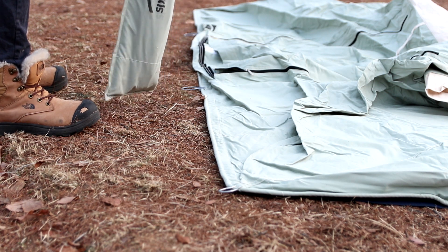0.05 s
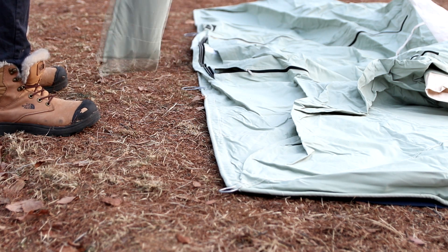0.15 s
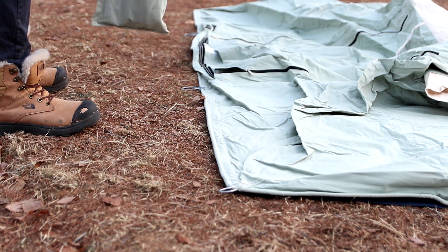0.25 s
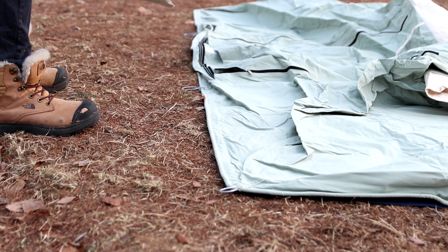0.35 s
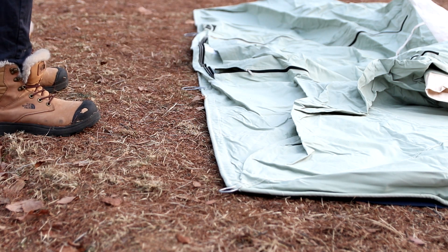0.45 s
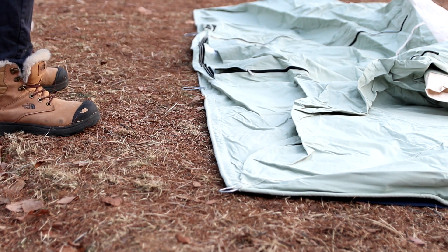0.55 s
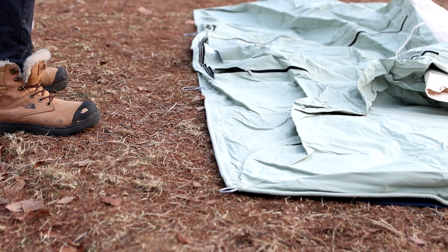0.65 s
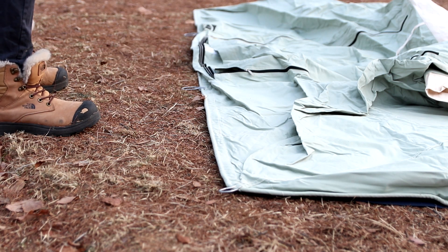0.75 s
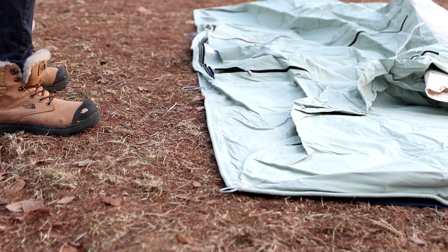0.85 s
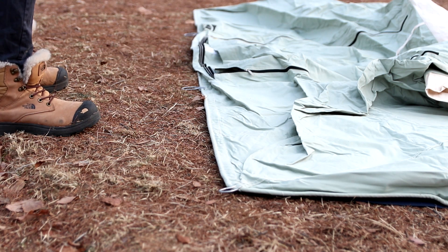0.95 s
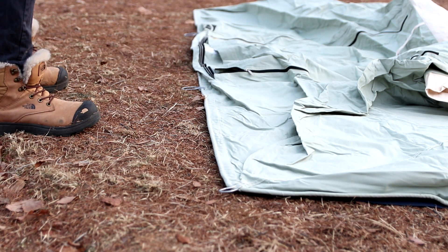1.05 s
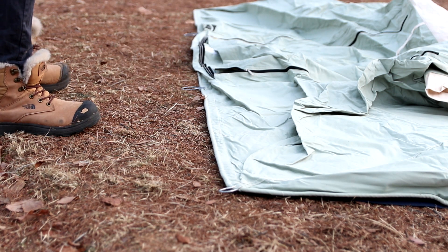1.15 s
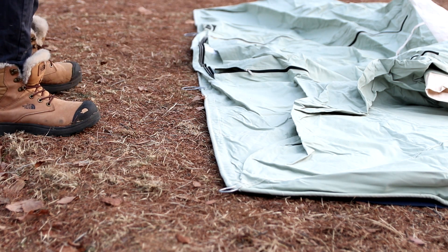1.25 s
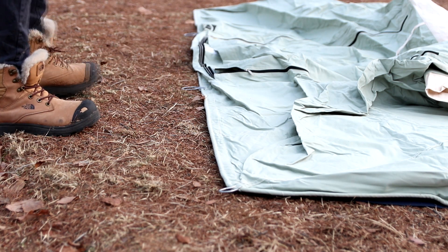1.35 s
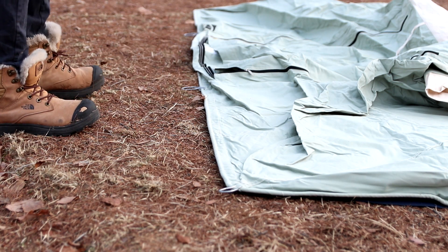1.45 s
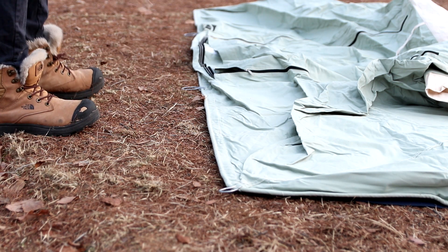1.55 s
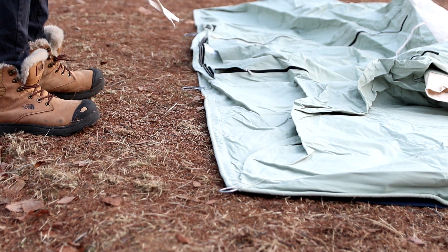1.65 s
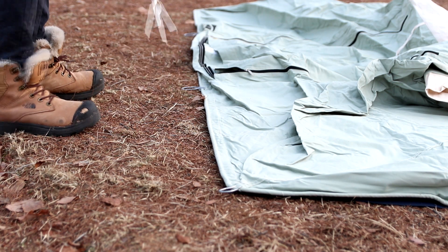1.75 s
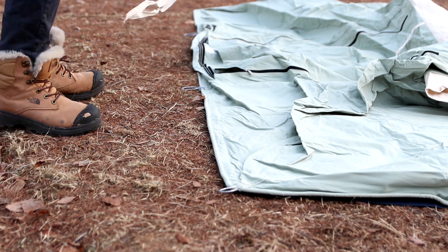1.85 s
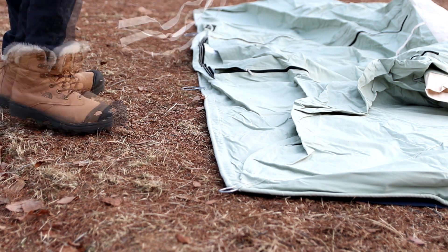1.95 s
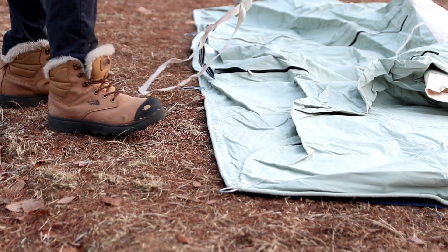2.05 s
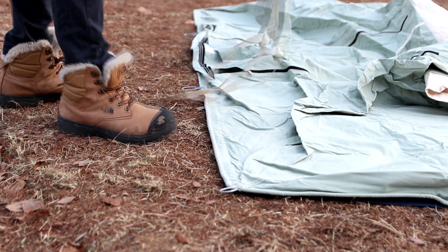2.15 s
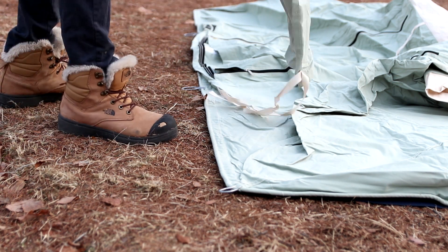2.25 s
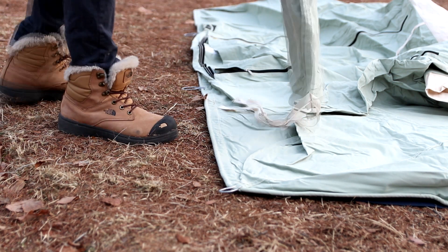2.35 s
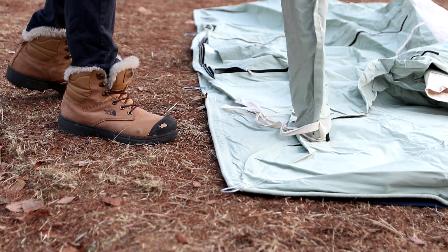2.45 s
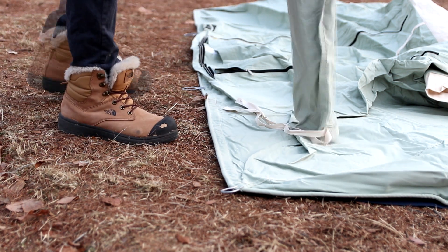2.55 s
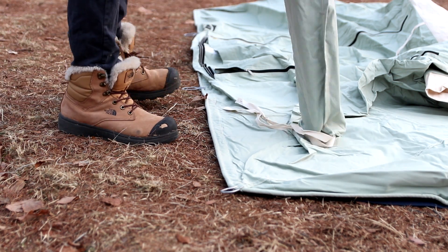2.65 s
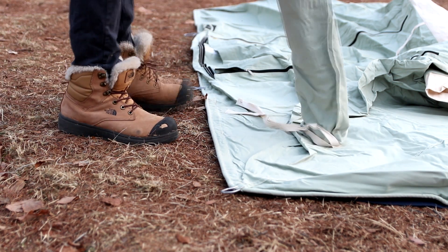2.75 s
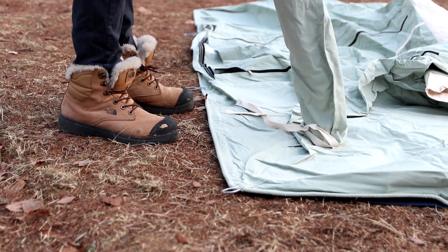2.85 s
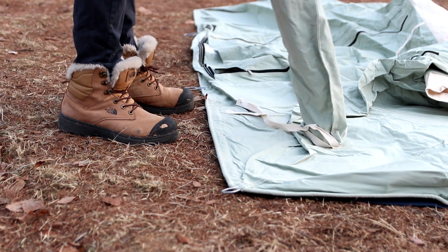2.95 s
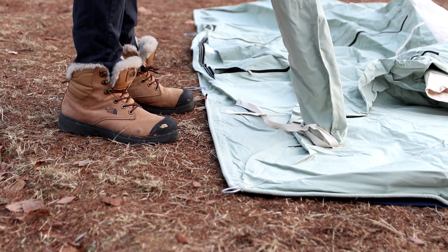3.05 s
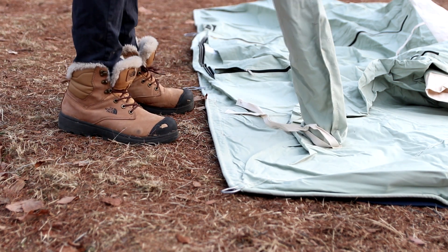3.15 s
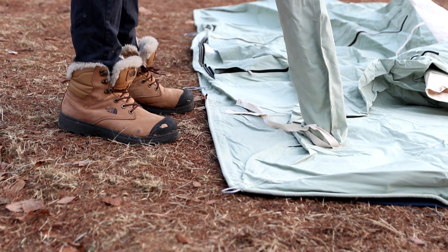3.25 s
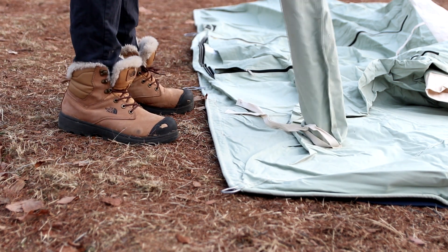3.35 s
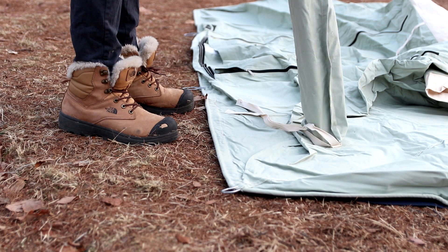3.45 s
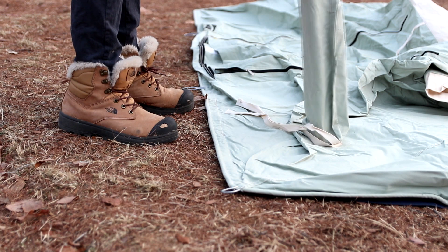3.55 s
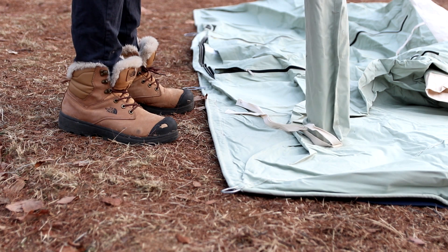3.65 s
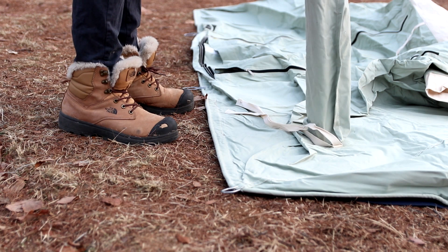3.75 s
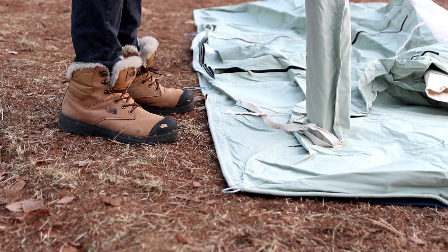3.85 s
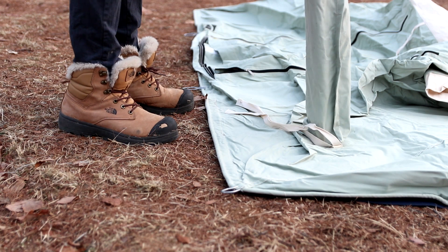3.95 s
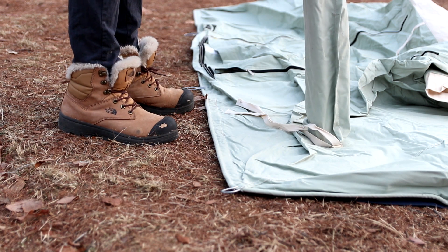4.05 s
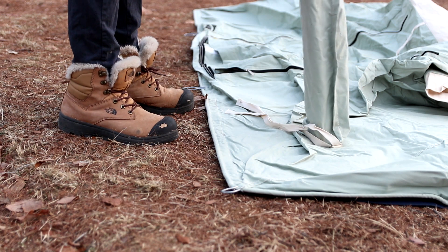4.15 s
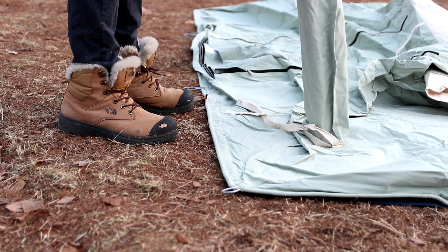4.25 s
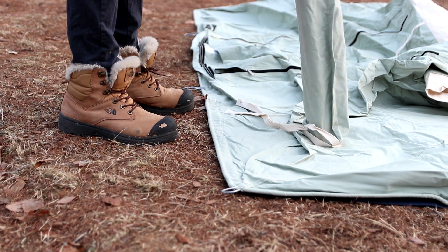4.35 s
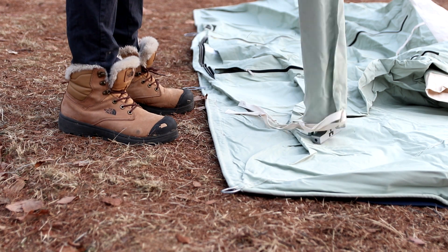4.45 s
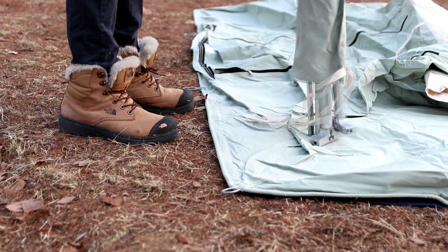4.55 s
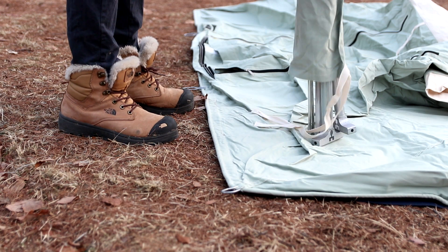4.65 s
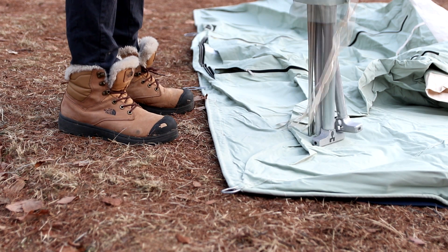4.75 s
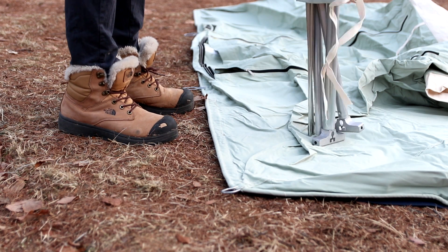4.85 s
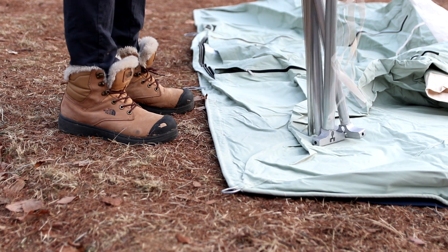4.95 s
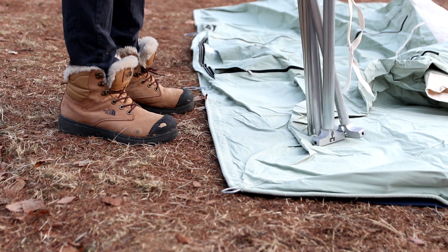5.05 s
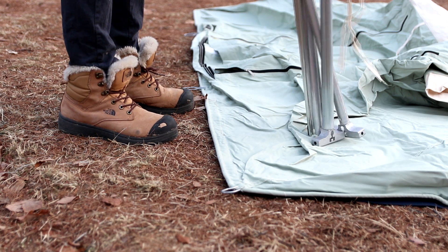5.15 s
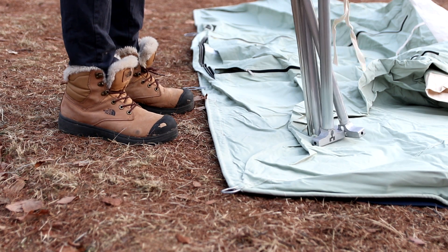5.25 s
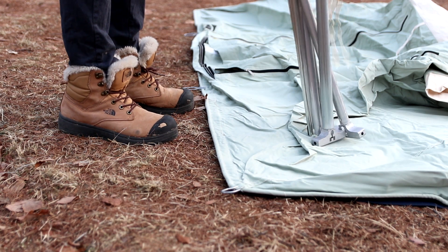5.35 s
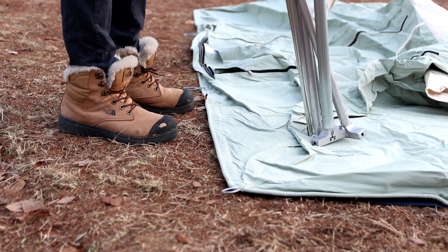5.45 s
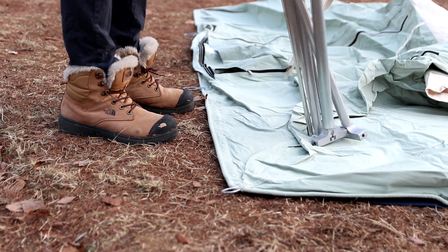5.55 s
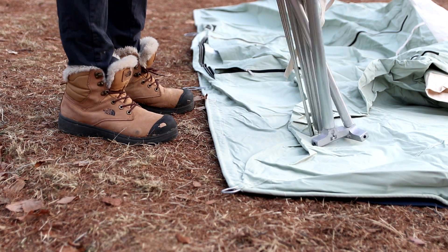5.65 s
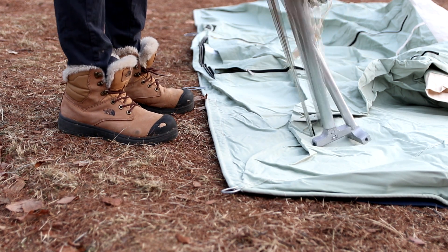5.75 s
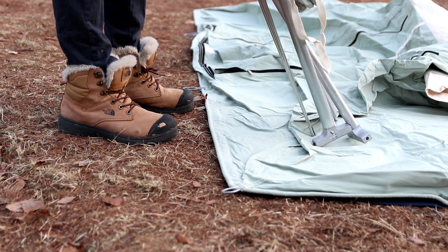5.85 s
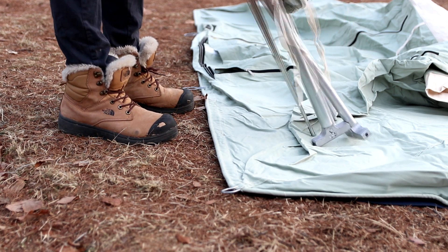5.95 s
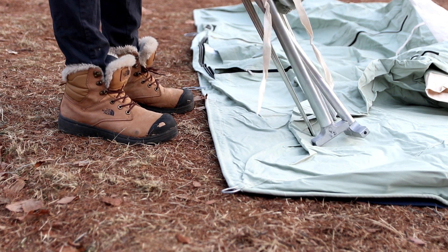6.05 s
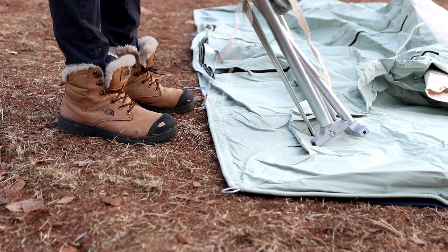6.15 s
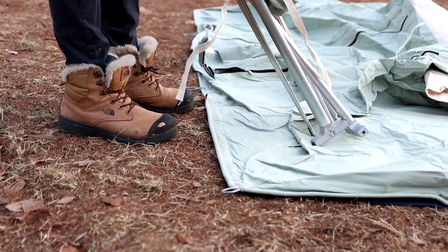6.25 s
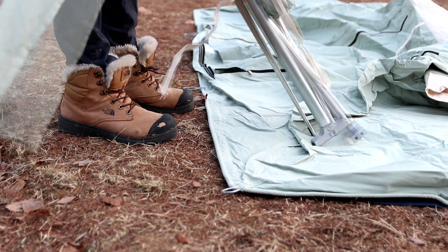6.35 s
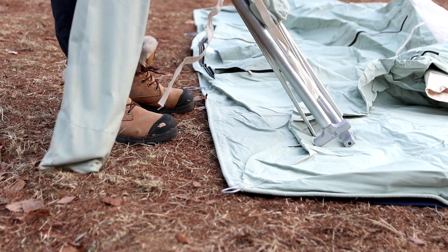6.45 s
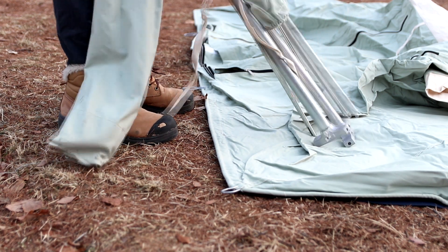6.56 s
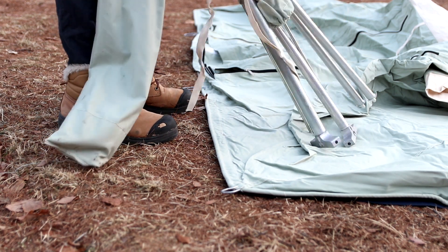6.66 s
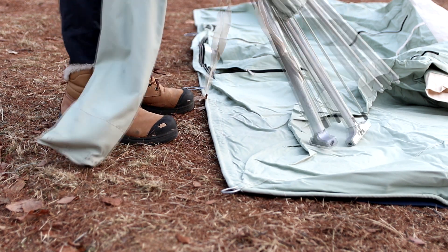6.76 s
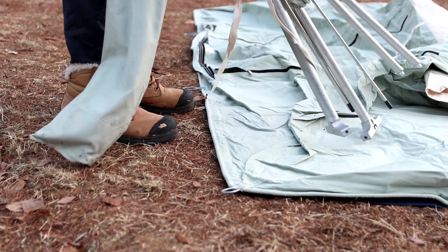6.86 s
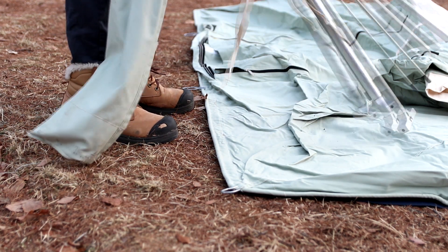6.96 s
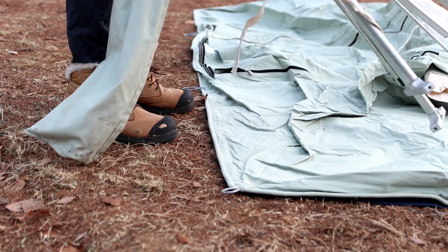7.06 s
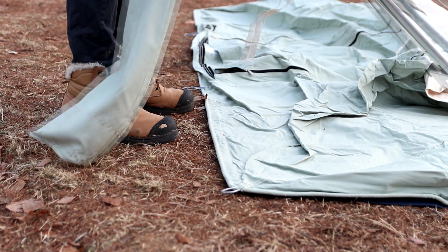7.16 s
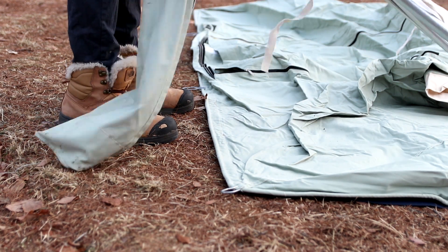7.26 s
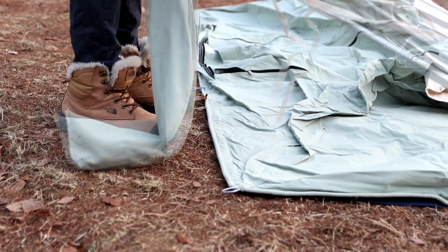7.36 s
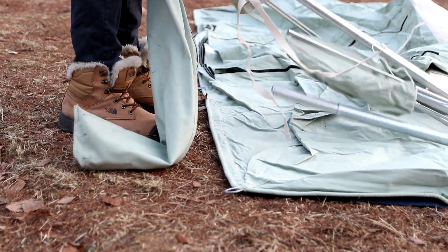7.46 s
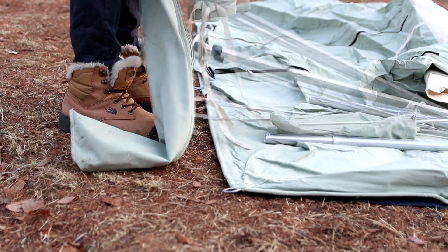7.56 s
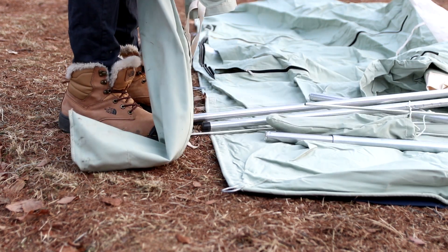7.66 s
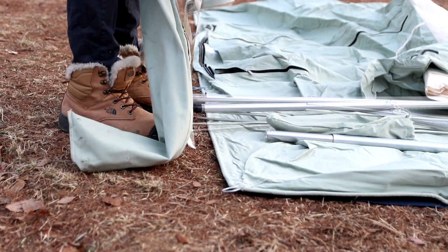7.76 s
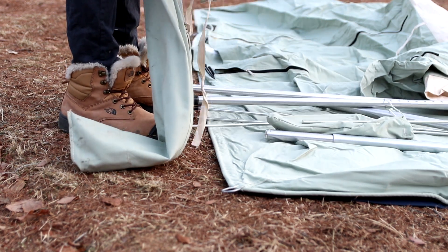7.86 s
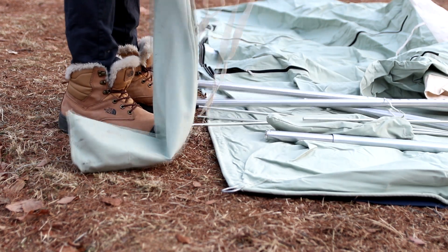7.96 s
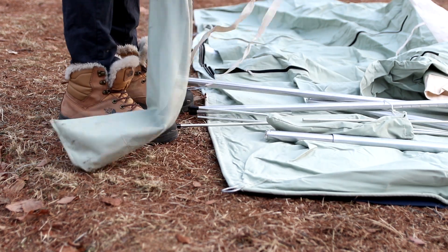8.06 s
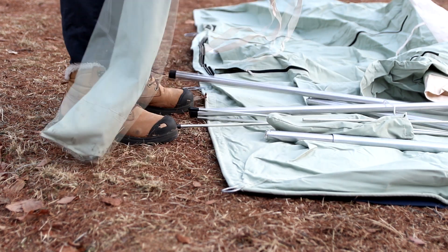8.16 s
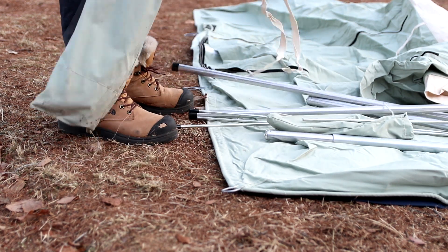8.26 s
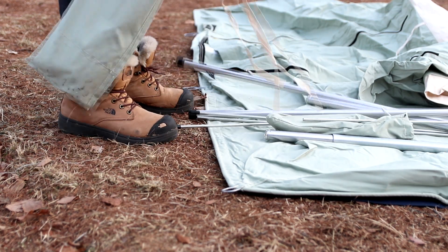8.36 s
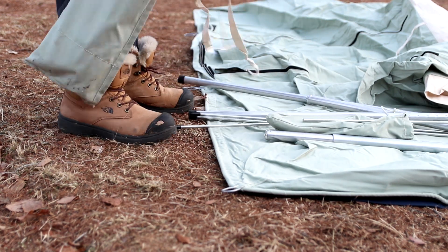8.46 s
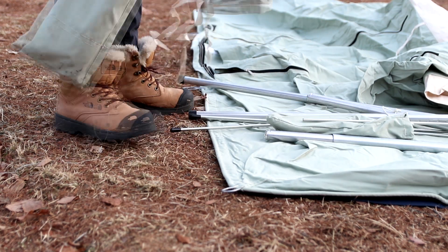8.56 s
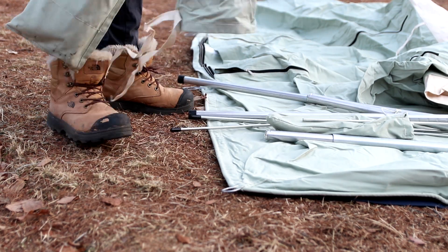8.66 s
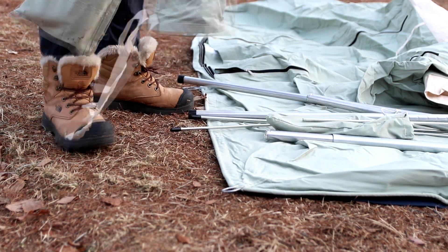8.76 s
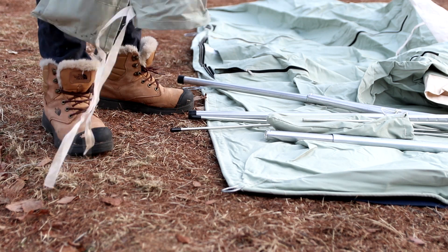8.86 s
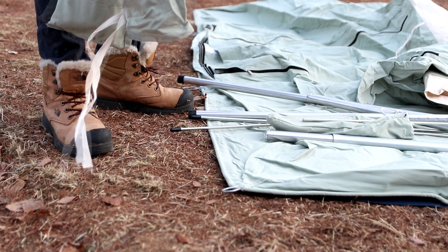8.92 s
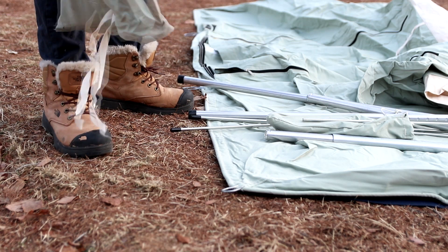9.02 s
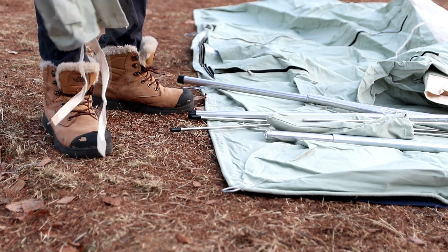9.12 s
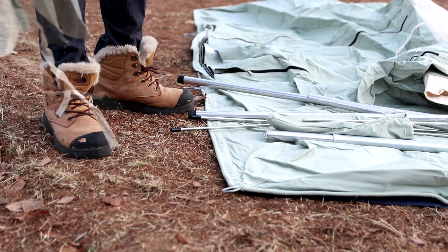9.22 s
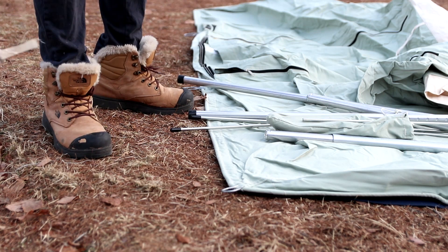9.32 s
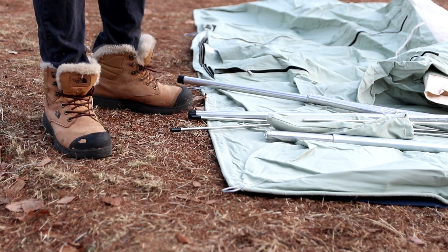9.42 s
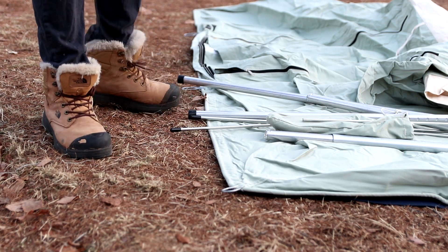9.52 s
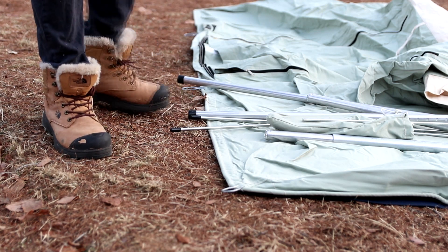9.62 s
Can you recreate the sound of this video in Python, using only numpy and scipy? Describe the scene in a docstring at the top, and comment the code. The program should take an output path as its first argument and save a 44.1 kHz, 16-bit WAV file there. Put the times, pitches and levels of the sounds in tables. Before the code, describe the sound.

Close, dry outdoor handling of metal tent poles: canvas rustles, tubes clack in sharp bursts, stakes jingle and everything clatters down onto cloth and dry ground.

```python
"""Outdoors on dry needles, close and without echo: tent poles leave their canvas bag and are laid down with stakes.
The tubes clack as coloured noise bursts and ring as beating sines; as they slide, uneven slips excite a resonance.
Steel stakes jingle from scattered ticks and ringing modes; bag, poles and boots land as low notes in puffs of noise.
Canvas rubs and swishes in strokes of noise with popping folds and crackling needles, over wind rumble and steady air.
The hardest knocks overload the microphone, which rounds off their peaks."""
import sys
import numpy as np
from scipy import signal
from scipy.fft import rfft, irfft, next_fast_len
from scipy.io import wavfile
from scipy.ndimage import map_coordinates

SR = 44100
rng = np.random.default_rng(int(sys.argv[2]) if len(sys.argv) > 2 else 0)


def transcribe(u):
    """Save the signal u as a 16-bit wav file named by the first command-line argument.

    u: samples, shape (n,) or (channels, n), limited to [-1, 1]; the rate is SR.
    q: integer samples, one column per channel.
    """
    v = np.clip(np.atleast_2d(u).T, -1, 1)
    q = np.round(v * 32767).astype(np.int16)
    wavfile.write(sys.argv[1], SR, q)


N = 427329

# Levels in the tables are relative: each layer has its own trims.
# tube strikes tube: start_s, level_db, extra hollow body_db, extra treble_db
TUBE_KNOCKS = [(0.8736, -28, 4.5, -13), (1.705, -35.5, 7, -13), (2.078, -34, -2, -32),
               (2.222, -32.5, -16, -18), (2.489, -20, -2, -19), (2.508, -22, -1, -30),
               (2.534, -19.5, 2, -13), (2.584, -23.5, -22, -33), (2.674, -25.5, -7, -10),
               (2.722, -26, 12, -10), (2.742, -12.5, -13, -16), (2.7656, -8.5, -8, -8),
               (2.8332, -9, -2, -7.5), (2.9473, -23.5, 1, -13), (2.9804, -20.5, 2, -12),
               (4.604, -19, -0.5, 3), (4.629, -23.5, -12, -9), (4.688, -26.5, -1, -6),
               (4.734, -10.5, -26, 6.5), (4.816, -27.5, -1, -3), (4.835, -26.5, 0, 2),
               (4.93, -29.5, -10, -3), (5.0244, -26.5, -3, -20), (5.0769, -31, -16, -34),
               (5.688, -21, -2, -1), (5.74, -21, -14, -12), (5.7513, -11.5, -12, -3),
               (5.772, -21.5, -7, -10), (6.096, -45, -3, -5), (6.5057, -17.5, -2.5, -2.5),
               (6.5759, -32.5, -6, -3), (6.6734, -27.5, -4, -11), (6.711, -30.5, 1, -27),
               (6.8114, -30, 4.5, -6), (6.8607, -15.5, -1, 11), (6.8755, -10.5, -3.5, 6.5),
               (6.908, -30, -8, 1), (7.409, -23, -25, -27), (7.5304, -5.5, -34, -3.5),
               (7.6298, -15, -34, 6), (7.723, -17.5, -25, 0), (7.811, -22, -1.5, 9), (7.866, -27, -18, 5),
               (7.947, -32, 0, 7), (8.045, -25.5, -5.5, 1), (8.068, -27.5, -3, 2.5), (8.163, -31, 3, -3),
               (8.353, -22.5, 3, -3), (8.4117, -19.5, 6, 0.5), (8.5119, -14, -10, 10), (8.544, -21, -3, 7),
               (8.56, -17.5, -1.5, 8), (8.7607, -24.5, -14, -10), (8.8763, -33, -12, -0.5),
               (9.673, -31.5, 10, -18)]
# colour of the clack: frequency_hz, level_db
CLACK_SPECTRUM = [(60, -32), (250, -2), (700, 5.5), (1500, 8), (2400, 6), (3400, 2), (5200, 1.5),
                  (6400, -1), (8200, 6.5), (10200, -6), (13000, -5), (16000, -11)]
# a harder blow presses the tubes together and damps them sooner
CLACK_T60_S, MEDIUM_BLOW_DB, DAMPING_DOUBLES_DB = 0.061, -20, 14.5
# a tube or stake left free sings on one note: start_s, pitch_hz, level_db, t60_s
FREE_NOTES = [(2.545, 4260, -34.5, 0.54), (2.62, 5750, -37, 0.2), (2.645, 4850, -37, 0.18),
              (2.742, 1400, -5.5, 0.034), (2.834, 4490, -27.5, 0.23), (2.949, 4580, -25, 0.094),
              (2.982, 5080, -38, 0.21), (4.629, 3400, -27, 0.076), (4.665, 1166, -26, 0.17),
              (4.734, 3550, -25, 0.22), (4.931, 1730, -15, 0.016), (5.078, 2470, -21, 0.066),
              (5.752, 8500, -16, 0.039), (6.875, 5150, -13, 0.077), (7.708, 3650, -26, 0.33),
              (7.811, 4206, -36, 0.4), (7.671, 2153, -18.5, 0.1), (7.811, 5080, -19, 0.47),
              (7.835, 5325, -27, 0.37), (7.865, 3000, -34, 1), (7.948, 4940, -30, 0.35),
              (8.044, 8500, -16.5, 0.023), (8.512, 9000, -15.5, 0.29), (8.512, 5720, -19, 0.11)]
# tubes sliding on each other and in their bag: start_s, length_s, resonance_hz, level_db
TUBE_SLIDES = [(3.348, 0.61, 510, -43), (4.416, 0.097, 525, -38.5), (4.596, 0.078, 5280, -23.5),
               (5.096, 0.16, 2700, -37.5), (6.932, 0.11, 2640, -34), (7.053, 0.73, 5280, -46),
               (7.054, 0.32, 8300, -46.5), (7.164, 0.049, 5520, -40), (7.294, 0.14, 5260, -40.5)]
# the stakes are jolted, chatter for a while and settle: start_s, level_db, hold_s
STAKE_JOLTS = [(2.542, -33, 0.016), (2.615, -31, .02), (3.3, -45, .012), (4.593, -34, 0.037),
               (4.734, -20.5, 0.022), (4.834, -30, .008), (6.571, -32.5, 0.019), (7.456, -31, .06),
               (7.531, -17, 0.048), (7.605, -23.5, 0.044), (7.666, -19, 0.024), (7.71, -19, 0.057),
               (7.801, -19, .07), (8.161, -34, 0.027), (8.353, -45, 0.019), (8.41, -22, 0.04),
               (8.514, -20.5, 0.062), (8.618, -27.5, .05), (8.759, -33.5, 0.017)]
JOLT_ATTACK_S, SETTLE_T60_S = 0.0053, 0.2
# modes of the stakes: pitch_hz, level_db, t60_s, spread between stakes_hz
STAKE_MODES = [(2190, -8, .12, 70), (2970, -8, .18, 45), (3680, -10, .2, 90), (4230, -13, .24, 20),
               (5060, -5, .22, 45), (5590, -9, .2, 55), (7250, -11, .22, 12), (8130, -6, .16, 70),
               (9027, -5, .2, 8), (9986, -16, .24, 12), (10993, -13, .24, 12), (12035, -8, .22, 18),
               (13112, -8, .2, 35), (14230, -7, .2, 90), (15400, -13, .18, 50)]
# colour of each stake contact tick: frequency_hz, level_db
TICK_SPECTRUM = [(80, -64), (400, -20), (800, 23.5), (1200, -47), (2200, 24), (4300, 4), (5200, 29.5),
                 (6400, 8), (8300, 4), (10300, -5), (14000, -5), (16000, -5)]
# soft landings of bag, poles and boots: start_s, level_db, pitch_hz
SOFT_LANDINGS = [(1.464, -18, 577), (2.471, -20, 474), (2.514, -9.5, 624), (2.53, -11.5, 343),
                 (2.534, -19, 84.5), (2.721, -13, 690), (2.735, -14.5, 288), (3.502, -27, 610),
                 (3.745, -29, 496), (3.814, -25.5, 460), (4.038, -27.5, 211), (4.444, -17, 530),
                 (6.637, -20, 494), (7.511, -8, 689), (7.519, -7.5, 215), (7.611, -14.5, 744.7),
                 (9.672, -23.5, 290)]
# strokes of the canvas, gathering speed and slowing again:
# fastest_s, rise_s, fall_s, rubbing_db, swish above rubbing_db
CANVAS_STROKES = [(0.55, 0.1, .09, -41.5, 2.5), (0.8, 0.39, .2, -46, -2.5), (1.47, 0.092, 0.42, -39.5, -5),
                  (2.7, 0.69, 0.11, -30.5, -5.5), (3.16, 0.03, 0.067, -37, -1.5),
                  (3.43, 0.58, 0.25, -41.5, -6), (3.76, 0.11, 0.058, -41, -0.5),
                  (4.05, 0.11, 0.056, -59, 9.5), (4.499, 0.052, 0.1, -28, -6),
                  (4.76, .12, 0.17, -29.5, -9.5), (5.04, 0.065, .17, -33.5, -4.5),
                  (5.66, 0.36, 0.42, -39, -4.5), (6.48, 0.1, 0.32, -35, -7.5), (7.12, 0.26, 0.14, -46, 3.5),
                  (7.55, 0.25, .14, -30, -4), (8.54, 0.19, 0.33, -33.5, -7), (9.42, 0.11, .07, -43.5, -6.5)]
IDLE_RUB_DB, IDLE_SWISH_DB = -49, -57  # the cloth never hangs quite still
# colour of cloth rubbing over the tubes: frequency_hz, level_db
RUB_SPECTRUM = [(100, -18.5), (280, -9), (500, 2), (750, 0), (1400, -1), (2400, -4), (4000, -16),
                (9000, -60)]
# colour of the cloth's airy swish: frequency_hz, level_db
SWISH_SPECTRUM = [(900, -26), (2500, 1), (4500, 1.5), (6000, 0.5), (8000, 5), (10500, -7.5), (14000, -5.5),
                  (16000, -12)]
# wind rumbles on the microphone: start_s, length_s, level_db
WIND_GUSTS = [(0.15, 0.58, -61), (8.047, 1.7, -52.5)]
# colour of the wind rumble: frequency_hz, level_db
RUMBLE_SPECTRUM = [(15, -3), (35, -2), (60, -5.5), (110, -21), (400, -60)]
# colour of the open air: frequency_hz, level_db
AIR_SPECTRUM = [(12, -25), (20, -9), (113, -6), (228, -1), (422, -3), (472, -3), (624, -4), (802, -4),
                (1760, -8), (1910, -7.5), (2390, -14), (7110, -18.5), (16000, -29.5)]
TOP_HZ = 15850  # the treble falls away above this


def knocks(clack_db=4, ring_db=-30, bundle_db=-27, bundle_t60=0.31, snap_db=-1, snap_t60=0.005, attack_s=0.00028):
    """Tubes pressed together give a snap and a dense, damped clack; the bundle buzzes on and the stakes ring faintly."""
    out, t = np.zeros(N), np.arange(SR // 3) / SR
    spot_hz = np.geomspace(300, 16000, 50)
    for start_s, level_db, body_db, treble_db in TUBE_KNOCKS:
        t60 = CLACK_T60_S * 2 ** ((MEDIUM_BLOW_DB - level_db) / DAMPING_DOUBLES_DB)
        hardness = [(700, body_db), (1400, 0), (3000, 0), (13000, treble_db)]
        # each point of contact favours its own groups of modes
        spot = np.column_stack([spot_hz, 3 * rng.standard_normal(len(spot_hz))])

        def colour_db(hz):
            """The clack's spectrum, bent by hardness and contact point."""
            return along(CLACK_SPECTRUM, hz) + along(hardness, hz) + along(spot, hz)

        clack = unit(coloured(rng.standard_normal(len(t)), colour_db))
        snap = amp(snap_db) * fade(t, snap_t60)
        bundle = amp(bundle_db) * fade(t, bundle_t60)
        attack = 1 - np.exp(-t / attack_s)
        clack *= (fade(t, t60) + snap + bundle) * attack
        add(out, start_s, amp(level_db) * (amp(clack_db) * clack + amp(ring_db) * stake_ring(t)))
    return out


def tube_notes(pair_hz=22, pair_db=-8):
    """The metal is not quite round, so each note is a close, beating pair."""
    out, t = np.zeros(N), np.arange(SR // 2) / SR
    for start_s, hz, level_db, t60 in FREE_NOTES:
        note = np.sin(2 * np.pi * hz * t)
        neighbour = np.sin(2 * np.pi * (hz + pair_hz) * t)
        add(out, start_s, amp(level_db) * fade(t, t60) * (note + amp(pair_db) * neighbour))
    return out


def slides(slip_rate=900, width_hz=190, slip_db=4.5, catch_db=12, release=0.78, wander=0.014, wander_rate=22):
    """A catch, then quick, uneven slips excite one resonance of the tube wall, which wanders as the contact moves."""
    out = np.zeros(N)
    for start_s, length_s, hz, level_db in TUBE_SLIDES:
        t = np.arange(round(length_s * SR)) / SR
        slips = (rng.random(len(t)) < slip_rate / SR) * amp(slip_db * rng.standard_normal(len(t)))
        slips[0] = amp(catch_db)
        wandering_hz = hz * (1 + wander * wobble(wander_rate)[:len(t)])
        turn = np.exp(2j * np.pi * np.cumsum(wandering_hz) / SR)
        # unwinding the pitch lets one plain decay act as a moving resonance
        decay = np.exp(-np.pi * width_hz * t)
        wall = (turn * signal.fftconvolve(slips / turn, decay)[:len(t)]).imag
        add(out, start_s, amp(level_db) * unit(wall) * np.abs(1 - t / length_s) ** release)
    return out


def chatter(rate=130, size_db=4, tick_db=-6, ring_db=-3, clink_db=-5):
    """A jolt clinks the stakes, then they touch many times a second: every contact ticks and sets a stake ringing."""
    out, t = np.zeros(N), np.arange(SR // 6) / SR
    tick_shape = fade(t, .032)
    for start_s, level_db, hold_s in STAKE_JOLTS:
        length_s = hold_s + SETTLE_T60_S / 2
        clock = np.arange(round(length_s * SR) + len(t)) / SR
        ticks, rings = np.zeros((2, len(clock)))
        count = max(round(length_s * rate), 1)
        contacts_s = (np.arange(count) + rng.random(count)) * length_s / count
        for contact_s in contacts_s:
            strength = amp(size_db * rng.standard_normal())
            add(ticks, contact_s, strength * tick_shape * noise(TICK_SPECTRUM, size=len(t)))
            add(rings, contact_s, strength * stake_ring(t))
        jingle = amp(tick_db) * unit(ticks) + amp(ring_db) * unit(rings)
        jingle *= np.sqrt(length_s * SR / len(clock))
        settling = fade(np.maximum(clock - hold_s, 0), SETTLE_T60_S)
        shaking = np.minimum(clock / JOLT_ATTACK_S, 1) * settling
        add(out, start_s, amp(level_db) * shaking * jingle)
        add(out, start_s, amp(level_db + clink_db) * stake_ring(t))
    return out


def stake_ring(t, scatter_db=5, pinched_db=-3, pinched_t60=0.13, pinched_hz=130, bend_db=-14, bend_t60=0.36, bends=10):
    """Two stakes touch: the free one rings on, the pinched one is detuned and damped; bending modes shift with the grip."""
    ring = np.zeros(len(t))
    draws = rng.standard_normal((len(STAKE_MODES), 3))
    for (hz, level_db, t60, spread_hz), (size, spot, pinch) in zip(STAKE_MODES, draws):
        free = fade(t, t60) * np.sin(2 * np.pi * (hz + spread_hz * size) * t)
        pinched = fade(t, pinched_t60) * np.sin(2 * np.pi * (hz + pinched_hz * pinch) * t)
        ring += amp(level_db + scatter_db * spot) * (free - amp(pinched_db) * pinched)
    bend_hz = rng.uniform(1400, 9600, bends)
    bending = rng.standard_normal(bends) @ np.sin(2 * np.pi * np.outer(bend_hz, t))
    return ring + amp(bend_db) * fade(t, bend_t60) * bending


def thuds(thud_db=-3, t60=0.045, typical_hz=550, linger=0.44, attack_cycles=0.69, puff_db=-6):
    """The ground takes a soft blow: a short low note in a puff of noise; the lower it is, the slower it rises and dies."""
    out, t = np.zeros(N), np.arange(SR // 5) / SR
    for start_s, level_db, hz in SOFT_LANDINGS:
        puff_spectrum = [(40, -30), (hz / 2, -4), (hz, 0), (hz * 2, -5), (3000, -28), (9000, -60)]
        puff = noise(puff_spectrum, size=len(t))
        push = np.sin(2 * np.pi * hz * t) + 2 * amp(puff_db) * puff
        attack = 1 - np.exp(-t * hz / attack_cycles)
        shape = fade(t, t60 * (typical_hz / hz) ** linger) * attack
        add(out, start_s, amp(level_db + thud_db) * push * shape)
    return out


def canvas(rub_db=-2, swish_db=-1, flutter_db=1, crease_db=-7, crackle_db=-9):
    """Cloth rubs over the tubes and swishes; folds pop and dry needles crackle in it."""
    rub_gain, swish_gain = cloth_motion()
    folds = grains(rate=220, centre_hz=1232, octaves=0.69, cycles=2.4, size_db=5.5)
    needles = grains(rate=220, centre_hz=4030, octaves=0.8, cycles=1.4, size_db=4.5)
    rubbing = amp(rub_db) * noise(RUB_SPECTRUM, size=N) + amp(crease_db) * folds
    swishing = amp(swish_db) * noise(SWISH_SPECTRUM, size=N) + amp(crackle_db) * needles
    # the cloth catches and lets go, so its level flutters
    flutter = amp(flutter_db * wobble(45))
    return flutter * (rub_gain * rubbing + swish_gain * swishing)


def cloth_motion():
    """Gains of rubbing and swishing: every stroke is a lopsided bell, and strokes add in power."""
    t = np.arange(N) / SR
    rub_power = np.full(N, amp(IDLE_RUB_DB) ** 2)
    swish_power = np.full(N, amp(IDLE_SWISH_DB) ** 2)
    for fastest_s, rise_s, fall_s, rub_db, swish_db in CANVAS_STROKES:
        width_s = np.where(t < fastest_s, rise_s, fall_s)
        stroke = amp(rub_db) * np.exp(-((t - fastest_s) / width_s) ** 2)
        rub_power += stroke ** 2
        swish_power += (amp(swish_db) * stroke) ** 2
    return np.sqrt(rub_power), np.sqrt(swish_power)


def grains(rate, centre_hz, octaves, cycles, size_db):
    """Tiny damped ticks of uneven pitch and size, rate a second, together at rms 1."""
    count, t = round(rate * N / SR), np.arange(SR // 100) / SR
    when, size = rng.random((2, count, 1))
    hz = np.clip(centre_hz * 2 ** (octaves * rng.standard_normal((count, 1))), 300, 15000)
    strength = amp(-size_db * np.log(size + .02))  # many small, few large
    ticks = strength * np.exp(-hz * t / cycles) * np.sin(2 * np.pi * hz * t)
    at = (when * N).astype(int) + np.arange(len(t))
    return unit(np.bincount(at.ravel(), ticks.ravel(), minlength=N)[:N])


def wind(edge_s=0.064, lumps_db=3):
    """Light gusts buffet the microphone in uneven lumps."""
    t, strength = np.arange(N) / SR, np.zeros(N)
    for start_s, length_s, level_db in WIND_GUSTS:
        to_edge_s = np.minimum(t - start_s, start_s + length_s - t)
        strength += amp(level_db) * np.clip(to_edge_s / edge_s, 0, 1)
    return strength * unit(amp(lumps_db * wobble(12)) * noise(RUMBLE_SPECTRUM, size=N))


def outdoors(air_db=-46):
    """The soft hush of the open air: coloured noise with a slight drift in level."""
    drift = amp(.5 * wobble(3))
    return amp(air_db) * drift * noise(AIR_SPECTRUM, size=N)


def amp(db):
    """Decibels to gain."""
    return 10 ** (np.asarray(db) / 20)


def unit(x):
    """Scaled to rms 1."""
    return x / np.sqrt(np.mean(x ** 2) + 1e-20)


def along(points, hz):
    """(frequency_hz, value) points read on a log frequency axis."""
    point_hz, value = np.transpose(points)
    return np.interp(np.log(hz + 1), np.log(point_hz + 1), value)


def wobble(rate):
    """A smooth random curve, rate knots a second."""
    knots = rng.standard_normal(int(N * rate / SR) + 4)
    return map_coordinates(knots, [np.arange(N) * rate / SR])


def coloured(x, gain_db):
    """x shaped by a gain in dB that depends on frequency."""
    size = next_fast_len(len(x) + 4096)  # room for the filter's tail
    gain = amp(gain_db(np.fft.rfftfreq(size, 1 / SR)))
    return irfft(rfft(x, size) * gain, size)[:len(x)]


def noise(spectrum, size):
    """Noise of rms 1 with the given spectrum."""
    return unit(coloured(rng.standard_normal(size), lambda hz: along(spectrum, hz)))


def fade(t, t60):
    """Free decay, 60 dB down after t60 seconds (1 ms at least)."""
    return np.exp(-np.log(1000) * t / max(t60, 1e-3))


def add(track, start_s, sound):
    """Mix a sound into the track at start_s, cut off at the track's end."""
    room = track[max(round(start_s * SR), 0):][:len(sound)]
    room += sound[:len(room)]


def scene():
    """Everything is close by and dry."""
    metal = knocks() + tube_notes() + slides() + chatter()
    return (metal + thuds() + canvas() + wind() + outdoors())[None]


def record(dry, low_cut_hz=22):
    """The loudest peaks are rounded off, the deepest bass is cut, and the treble drops steeply above TOP_HZ."""
    held = dry[0] / (1 + np.abs(dry[0]) ** 6) ** (1 / 6)
    held = signal.lfilter(*signal.butter(1, low_cut_hz, "high", fs=SR), held)
    # 1 dB down for every 10 Hz, to -80 dB
    return coloured(held, lambda hz: -np.clip((hz - TOP_HZ) / 10, 0, 80))[None]


dry = scene()
out = record(dry)
transcribe(out)
```